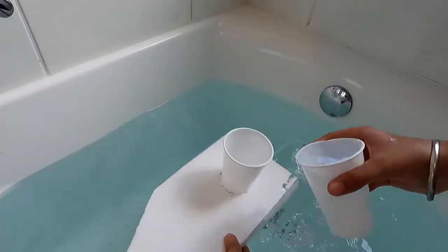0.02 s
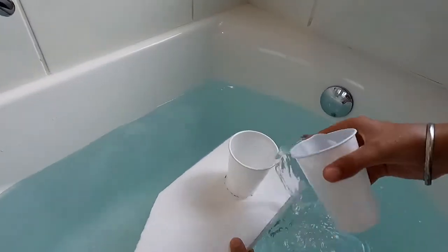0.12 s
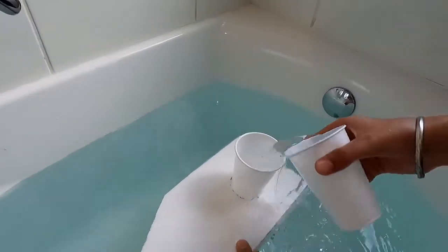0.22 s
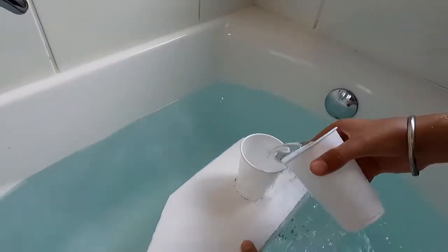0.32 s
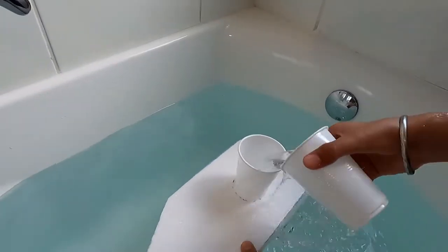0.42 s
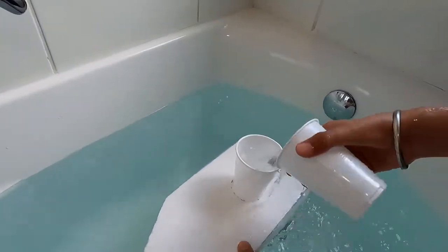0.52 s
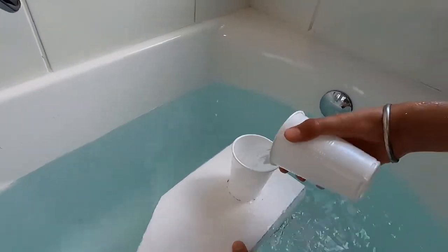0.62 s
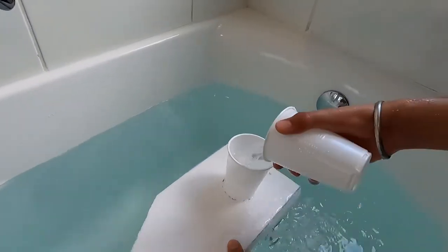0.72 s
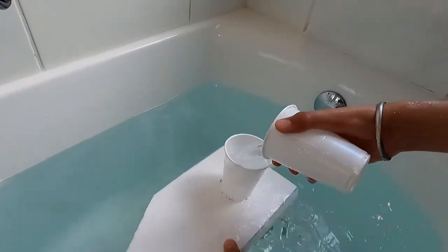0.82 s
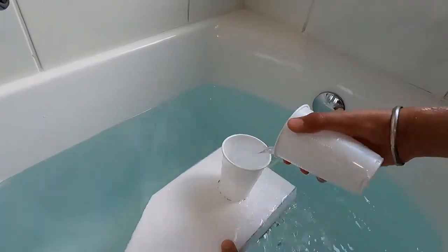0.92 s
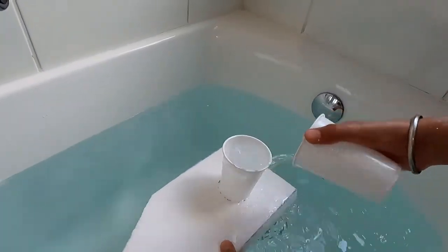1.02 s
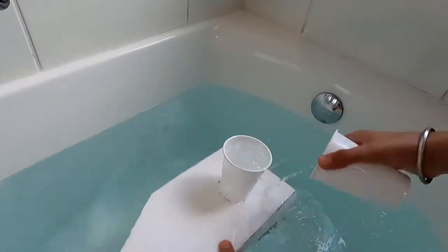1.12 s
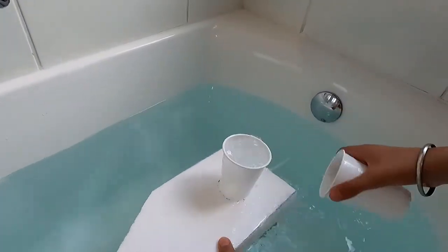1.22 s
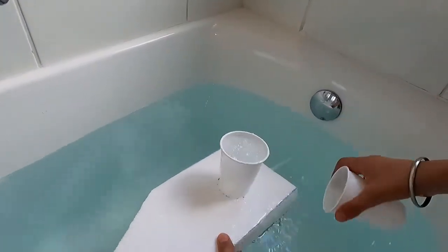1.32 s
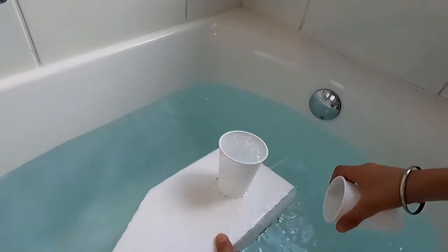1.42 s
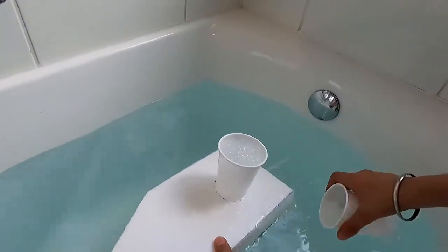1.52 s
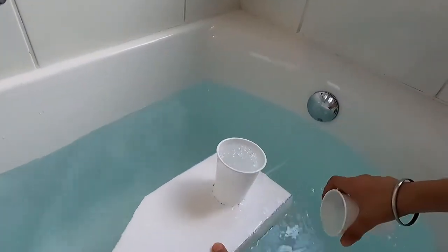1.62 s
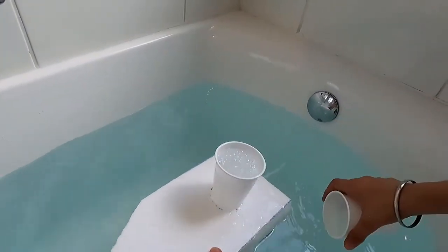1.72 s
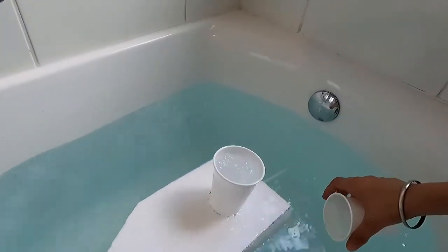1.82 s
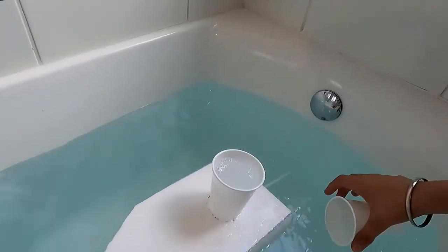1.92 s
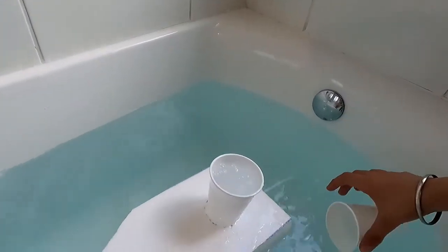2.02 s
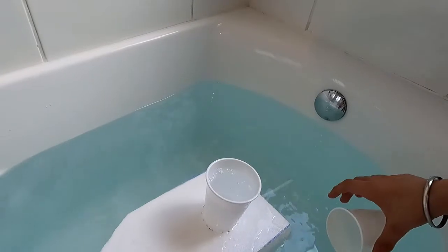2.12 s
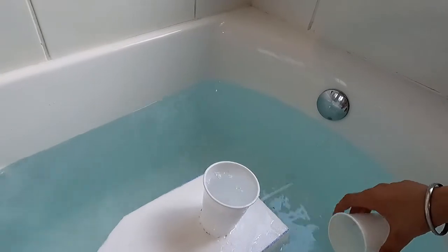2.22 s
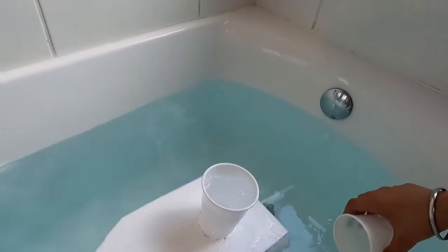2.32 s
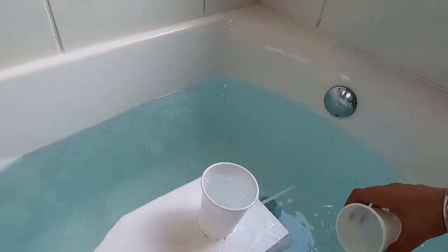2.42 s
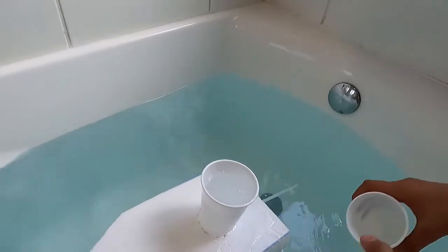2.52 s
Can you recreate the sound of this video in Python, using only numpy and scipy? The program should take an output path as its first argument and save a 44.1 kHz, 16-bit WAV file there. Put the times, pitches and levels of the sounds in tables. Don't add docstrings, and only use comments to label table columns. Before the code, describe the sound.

Water poured from a plastic cup into another cup, splashing and gurgling, then dripping into a bathtub

```python
import sys
import numpy as np
from scipy import signal
from scipy.fft import rfft, irfft, next_fast_len
from scipy.io import wavfile
from scipy.ndimage import map_coordinates

SR = 44100
rng = np.random.default_rng(int(sys.argv[2]) if len(sys.argv) > 2 else 0)


def invert_db(level):
    return 10 ** (np.asarray(level, dtype=float) / 20)


def persist_wave(psi):
    counts = np.round(np.clip(psi, -1, 1) * 32767).astype(np.int16)
    wavfile.write(sys.argv[1], SR, np.atleast_2d(counts).T)


N = 114660
LEAD = SR // 5
TOTAL = N + LEAD
RISE = 0.099
LEFT_RIGHT = np.array([[1], [-1]])


def unit(x):
    return x / np.sqrt(np.mean(x ** 2) + 1e-20)


def curve(rows, axis=1):
    rows = np.array(rows, float)
    seconds = (np.arange(TOTAL) - LEAD) / SR
    return np.interp(seconds, rows[:, 0], rows[:, axis])


def coloured(x, points):
    size = x.shape[-1]
    m = next_fast_len(size + 8192)
    hz, db = np.transpose(points)
    log_hz = np.log(np.fft.rfftfreq(m, 1 / SR) + 1)
    gain = invert_db(np.interp(log_hz, np.log(hz), db))
    return irfft(rfft(x, m) * gain, m)[..., :size]


def wobble(rate):
    knots = rng.standard_normal(int(TOTAL * rate / SR) + 4)
    return map_coordinates(knots, [np.arange(TOTAL) * rate / SR])


def place(s, waves):
    size = waves.shape[1]
    at = np.round(s * SR).astype(int)[:, None] + LEAD + np.arange(size)
    return np.bincount(at.ravel(), waves.ravel(), TOTAL + size)[:TOTAL]


def bubbles(s, gain, hz, cycles, rise, size, swell=0.48):
    t = np.arange(size) / SR
    hz = hz[:, None]
    cycles = np.clip(cycles, .5, 300)[:, None]
    life = t * hz / cycles
    climb = rise * np.minimum(1, 12 / cycles)
    phase = 2 * np.pi * hz * t * (1 - climb / 3 + climb * np.minimum(life, 2) / 2)
    swelling = (1 - np.exp(-t * hz / max(swell, .1))) ** 2
    fade = np.exp(-2 * life) * (1 - t / t[-1])
    return place(s, gain[:, None] * np.sin(phase) * swelling * fade)


def swarm(count, hz, spread, cycles, scatter_db, size):
    r = rng.random((count, 2))
    s = r[:, 0] * N / SR
    mean_hz = hz[(s * SR).astype(int) + LEAD]
    pitch = np.clip(mean_hz * np.exp(spread * rng.standard_normal(count)), 80, 14000)
    gain = invert_db(np.minimum(-scatter_db * np.log(r[:, 1]), 15))
    return unit(bubbles(s, gain, pitch, cycles + 0 * s, RISE, size))


# pitch in Hz, level in dB.
CLICK_COLOUR = [(1500, -6.5), (6000, 1), (10000, -2), (15000, -10)]


def clicks(s, gain):
    t = np.arange(SR // 50) / SR
    noise = np.diff(rng.standard_normal((len(s), len(t) + 1)))
    fade = invert_db(-30 * t / 0.0082)
    return coloured(place(s, gain[:, None] * noise * fade), CLICK_COLOUR)


# start in seconds, peak level in dB, pitch in Hz, life in cycles.
BIG_BUBBLES = [(.116, -44.5, 1661, 410), (0.1157, -33.5, 1655, 34), (0.2256, -4.5, 2020, 20),
               (.2385, -22.5, 1102, 21), (.268, -27, 822, 17), (.362, -20.5, 1027, 11),
               (.464, -19, 1664, 16), (.584, -21.5, 1310, 8.6), (.605, -22, 1320, 15.5),
               (0.6546, -8, 1343, 6.6), (.703, -12, 2320, 4.8), (0.733, -13, 1320, 4.7),
               (.72, -25.5, 3895, 40), (.612, -28, 3020, 12), (0.569, -22, 4100, 14.6),
               (.648, -20, 2230, 14.6), (.965, -22.5, 890, 6), (0.967, -20, 2680, 6.3),
               (.972, -26.5, 4175, 40), (.996, -24.5, 2250, 7), (1.013, -30, 2370, 11),
               (1.083, -29.5, 2520, 14), (1.08, -28, 1338, 14.5), (1.11, -30, 2350, 20),
               (1.146, -30.5, 867, 9), (1.155, -28, 387, 4.3), (1.162, -23, 2470, 10.8),
               (1.259, -13, 2080, 3), (1.386, -26.5, 3010, 9.5), (1.4258, -12, 1890, 7.1),
               (1.4446, -24.5, 1780, 5), (1.4284, -10.5, 2640, 3.5), (1.443, -13.5, 2220, 7.1),
               (1.426, -32, 1030, 2.4), (1.474, -31, 3000, 9.1), (1.545, -28.5, 3150, 10.3),
               (1.545, -30, 1120, 4.6), (1.635, -38.5, 3150, 14), (1.776, -37.5, 1060, 5.4),
               (1.845, -46, 4970, 25), (2.285, -52, 683, 6.6), (1.62, -42, 914, 24),
               (1.773, -26, 1880, 9.9), (2.295, -55, 2340, 17), (2.354, -50, 1060, 3.3),
               (2.354, -48, 450, 2.5)]
# start in seconds, peak level in dB, pitch in Hz, life in cycles.
EARLIER_BUBBLES = [
    (-.09, -27, 1900, 27),
    (-0.19, -22.5, 11000, 11),
]


def plops():
    s, db, hz, cycles = np.transpose(np.concatenate([BIG_BUBBLES, EARLIER_BUBBLES]))
    rings = bubbles(s, invert_db(db + 2.0), hz, cycles, RISE, size=5000, swell=0.79)
    return rings + clicks(s, invert_db(db - 34.5))


# start in seconds, peak level in dB, pitch in Hz, click over bubble in dB.
DROPS = [(.133, -22.5, 3960, -4), (.155, -26.5, 5480, -1), (.19, -24, 4580, -10), (.207, -18.5, 5040, -24),
         (.214, -19, 5530, -22), (0.2236, -12.5, 3440, -24), (.247, -39, 6800, 8), (.29, -17, 4900, -17),
         (.397, -15, 4200, -14), (.403, -17.5, 5300, -23), (.491, -14, 3840, -11), (.546, -18.5, 5930, -19),
         (.598, -24, 8060, -1), (.669, -16, 3420, -2), (.732, -14.5, 4500, -2), (.895, -24, 3840, -9),
         (.968, -18.5, 3900, -6), (1.011, -24.5, 3450, -12), (1.068, -25.5, 5200, -1.5),
         (1.161, -24.5, 4850, -22), (1.216, -41.5, 4500, 12), (1.329, -23.5, 4650, -6.5),
         (1.386, -24, 4200, -12), (1.535, -28, 8850, -2), (1.774, -37, 4410, 12), (1.791, -28.5, 5100, -8),
         (1.951, -29, 4780, -4), (2.43, -53, 4320, 11), (.331, -25.5, 4700, -12), (.649, -22.5, 4730, -12),
         (.849, -25.5, 3330, -8), (1.1, -27.5, 5100, 5), (1.627, -37, 3770, -8)]
# start in seconds, peak level in dB, pitch in Hz.
FAINT_DRIPS = [(.05, -46, 11800), (0.461, -27, 8370), (.996, -32, 8100), (1.445, -36.5, 7200),
               (1.545, -33, 4570), (1.818, -38, 4170), (1.897, -39, 4100), (1.926, -50, 9100),
               (2.055, -45.5, 12000), (2.198, -48.5, 5400), (2.356, -43.5, 6700), (2.367, -50, 4930)]


def splats():
    drips = np.column_stack([FAINT_DRIPS, np.full(len(FAINT_DRIPS), -5)])
    s, db, hz, click_db = np.transpose(np.concatenate([DROPS, drips]))
    chance = rng.uniform(-1, 1, size=(len(s), 2, 4)) * [0, 1, 1, 1]
    delay = abs(chance[:, 0])
    at = (s[:, None] + 0.0032 * delay).ravel()
    pitch = hz[:, None] * np.exp(0.17 * chance[:, 1])
    follower_db = np.array([0, -5, -5, -5])
    gain = invert_db(db[:, None] + 2.5 + follower_db - 2.5 * delay)
    cluster = bubbles(at, gain.ravel(), pitch.ravel(), 6.62 + 0 * at, RISE, size=400)
    return cluster + clicks(s, invert_db(db + click_db - 8))


# start in seconds, peak level in dB, pitch in Hz.
AIR_POCKETS = [(0.295, -20, 1050), (.384, -20, 1010), (.398, -21.5, 1030), (.43, -38, 1040),
               (.457, -23.5, 1027), (.472, -21.5, 1000), (.538, -22.5, 1310), (.564, -17, 1280),
               (.576, -20, 1400), (.59, -18.5, 1234), (.612, -19, 1335), (0.644, -22, 1400),
               (.65, -18, 1310), (0.662, -16, 1353), (0.676, -25, 1360), (0.693, -18, 1290),
               (.709, -20, 1480), (0.721, -18, 1340), (0.727, -21, 1330), (.745, -28, 1400),
               (.751, -18, 1650), (0.766, -19.5, 1570), (.779, -25, 1360), (0.79, -25, 1320),
               (.903, -27.5, 1447), (0.973, -27.5, 1530)]


def glugs():
    s, db, hz = np.transpose(AIR_POCKETS)
    return bubbles(s, invert_db(db + 2.5), hz, 7.5 + 0 * s, RISE, size=1500, swell=0.9)


# time in seconds, level in dB, gurgle pitch in Hz.
CUP_STREAM = [
    (.225, -83, 950),
    (.27, -52.5, 928),
    (.34, -46, 990),
    (.4, -42, 1033),
    (.52, -45.5, 1290),
    (.66, -38, 1340),
    (.79, -39, 1354),
    (.83, -43.5, 1470),
    (1.1, -56.5, 1420),
    (1.45, -84.5, 1470),
]
# time in seconds, level in dB.
DEEP_CHURN = [
    (.3, -83),
    (.37, -50),
    (.75, -45),
    (1.15, -57.5),
    (1.45, -79),
]


def cup():
    hz = curve(CUP_STREAM, axis=2)
    steady = np.ones(TOTAL)
    gurgle = swarm(count=260, hz=hz, spread=0.069, cycles=8.7, scatter_db=2, size=1200)
    wide = swarm(count=1500, hz=1.324 * hz, spread=0.359, cycles=4.9, scatter_db=1.0, size=700)
    churn = swarm(count=900, hz=600 * steady, spread=0.392, cycles=6.4, scatter_db=-0.5, size=1500)
    boom = swarm(count=150, hz=375 * steady, spread=0.025, cycles=5.6, scatter_db=13.0, size=2500)
    stream_level = invert_db(curve(CUP_STREAM) + 3.0 * wobble(20.43))
    stream = stream_level * (gurgle + invert_db(2.5) * wide)
    return stream + invert_db(curve(DEEP_CHURN)) * (churn + invert_db(-9.5) * boom)


# time in seconds, level in dB.
SPRAY_LEVEL = [(0, -54.5), (.2, -55.5), (.24, -36.5), (.45, -38), (.75, -37.5), (.85, -49.5), (1.1, -44),
               (1.3, -50), (1.75, -58.5), (2.05, -70), (2.27, -86), (2.3, -65.5), (2.45, -68.5),
               (2.6, -75.5)]
# pitch in Hz, level in dB.
HISS_COLOUR = [(530, -40.5), (900, -21.5), (1120, -13), (2570, -3.5), (3040, -16), (4680, -9.5),
               (12100, -25.5), (16000, -55.5)]


def spray():
    flat = np.ones(TOTAL)
    fizz = [swarm(count=2500, hz=4200 * flat, spread=0.553, cycles=7.7, scatter_db=4.0, size=250)
            for _ in range(2)]
    crackle = [swarm(count=900, hz=4800 * flat, spread=.4, cycles=1.8, scatter_db=5, size=60)
               for _ in range(2)]
    hiss = unit(coloured(rng.standard_normal((2, TOTAL)), HISS_COLOUR))
    mixture = invert_db(-1.5) * np.array(fizz) + invert_db(-6) * np.array(crackle) + invert_db(-5.5) * hiss
    return invert_db(curve(SPRAY_LEVEL) + 0.93 * wobble(14) + 2.73 * wobble(44.69)) * mixture


def foam():
    hz = np.full(TOTAL, 9500.0)
    ears = [swarm(count=500, hz=hz, spread=0.32, cycles=4, scatter_db=7.5, size=60) for _ in range(2)]
    return invert_db(-74) * np.array(ears)


# start in seconds, peak level in dB, pitch in Hz.
TUB_BOOMS = [
    (0.215, -32.5, 68.5),
    (1.656, -30.5, 75),
    (2.381, -42.5, 71),
    (2.548, -29.5, 35),
    (2.581, -27.5, 45),
]


def thuds():
    s, db, hz = np.transpose(TUB_BOOMS)
    return bubbles(s, -invert_db(db), hz, 1.3 + 0 * s, 0, size=5000)


def wide_noise(points, side_db):
    middle, side = unit(coloured(rng.standard_normal((2, TOTAL)), points))
    return unit(middle + invert_db(side_db) * side * LEFT_RIGHT)


# time in seconds, level in dB.
LAP_LEVEL = [(0, -56.5), (.35, -55), (1.5, -58.5), (1.7, -53), (2.31, -55.5), (2.37, -44.5), (2.47, -50),
             (2.52, -55.5), (2.6, -56)]
# pitch in Hz, level in dB.
LAP_COLOUR = [(12, -43.5), (20, -9.5), (73, 0), (118, -12), (160, 2), (231, -2), (259, -7.5), (439, -16),
              (600, -22.5), (780, -37.5), (1320, -120)]


def lapping():
    return wide_noise(LAP_COLOUR, side_db=-5.0) * invert_db(curve(LAP_LEVEL) + 2.4 * wobble(7.26))


# pitch in Hz, level in dB.
AIR_COLOUR = [(250, -28.5), (400, -8.5), (750, -12), (1150, -4.5), (1500, -11.5), (3200, -34.5),
              (5500, -13), (9000, -18.5), (16000, -27)]


def room_air():
    return invert_db(-64 + 0.5 * wobble(41)) * wide_noise(AIR_COLOUR, side_db=-2.5)


# pitch in Hz, time to fade by 60 dB in seconds.
TILE_ECHO = [(300, 0.68), (1000, 1), (2000, 0.84), (3500, 0.72), (6000, 0.7), (12000, 0.2)]


def bathroom(x):
    hz, t, z = signal.stft(rng.standard_normal((2, SR)), SR, nperseg=256)
    echo_hz, echo_s = np.transpose(TILE_ECHO)
    t60 = np.interp(np.log(hz + 1), np.log(echo_hz), echo_s)[:, None]
    tiles = invert_db(-60 * t / t60)
    tub = invert_db(-3.5 - 60 * t / 0.1)
    tail = signal.istft(z * (tiles + tub), SR, nperseg=256)[1]
    tail = invert_db(-7) * np.pad(tail / np.linalg.norm(tail[0]), ((0, 0), (300, 0)))
    walls = rng.integers(50, 330, size=(2, 8))
    tail[[[0], [1]], walls] += invert_db(-12.5) * rng.uniform(-1.34, 1, (2, 8))
    middle, side = signal.fftconvolve(x[None], tail, axes=1)[:, :len(x)]
    direct = x * invert_db([[-.6], [.6]])
    return direct + middle + invert_db(-6) * side * LEFT_RIGHT


# pitch in Hz, level in dB.
DROP_WIDTH = [(2500, -29), (7000, -15), (12000, 0)]


def scene():
    spray_middle, spray_side = spray()
    water = plops() + glugs() + splats() + spray_middle + cup()
    spray_wide = coloured(spray_side, [(1000, 1.5), (12000, -3.5)]) * invert_db(-6) * LEFT_RIGHT
    drops_wide = coloured(splats(), DROP_WIDTH) * LEFT_RIGHT
    background = lapping() + room_air()
    mix = bathroom(water) + spray_wide + drops_wide + foam() + thuds() + background
    return mix[:, LEAD:]


def band_limit(x):
    return signal.sosfilt(signal.butter(12, 16330, fs=SR, output="sos"), x)


def record(dry):
    m = next_fast_len(N + 8192)
    lag_s = .7 / SR
    turn = np.pi * np.fft.rfftfreq(m, 1 / SR) * lag_s * np.array([[-1], [1]])
    shifted = irfft(rfft(dry, m) * np.exp(1j * turn), m)[:, :N]
    mix = coloured(shifted, [(30, -5.5), (7000, 0.0), (13000, -5), (15400, -23.5), (16200, -72)])
    return band_limit(mix)


dry = scene()
out = record(dry)
persist_wave(out)
```